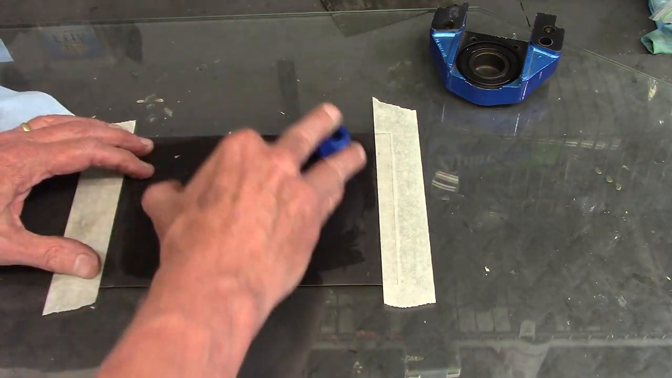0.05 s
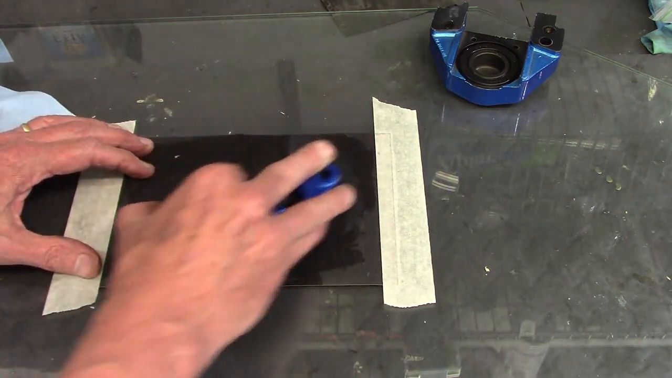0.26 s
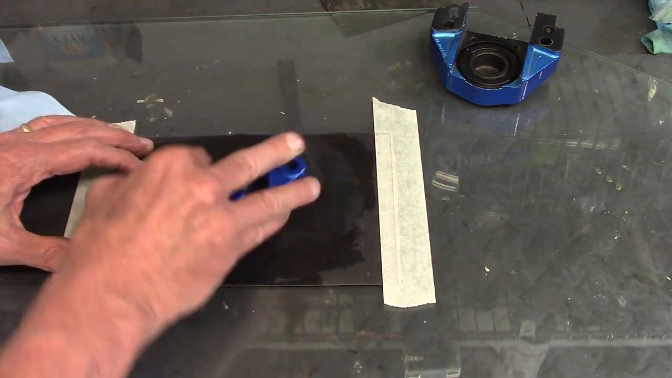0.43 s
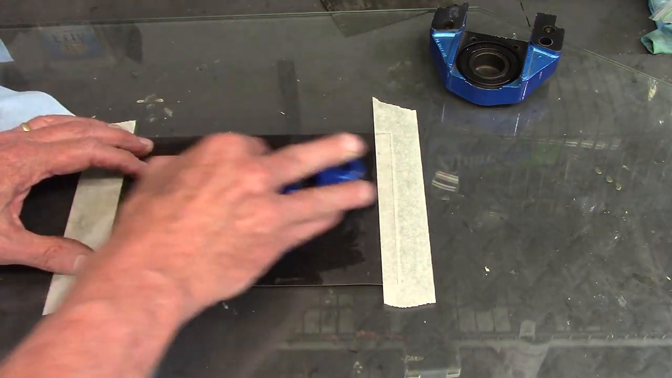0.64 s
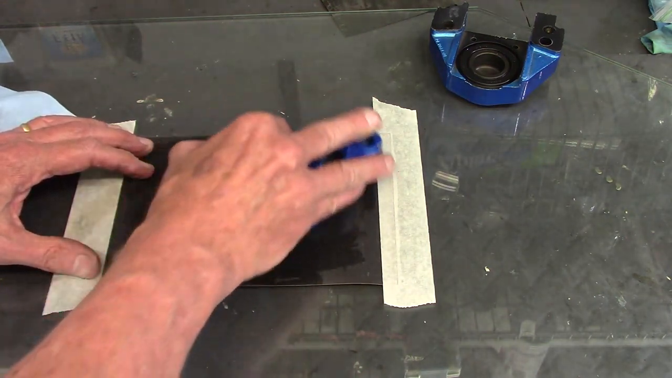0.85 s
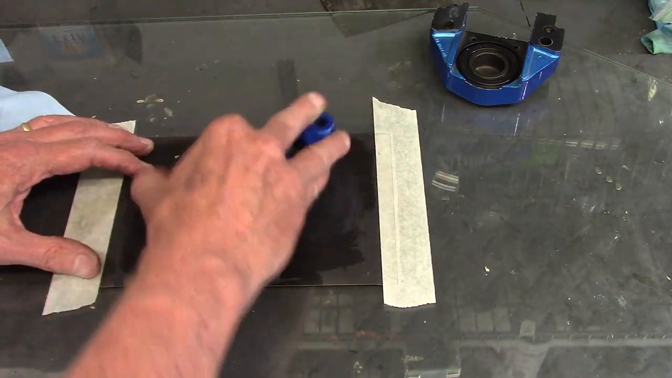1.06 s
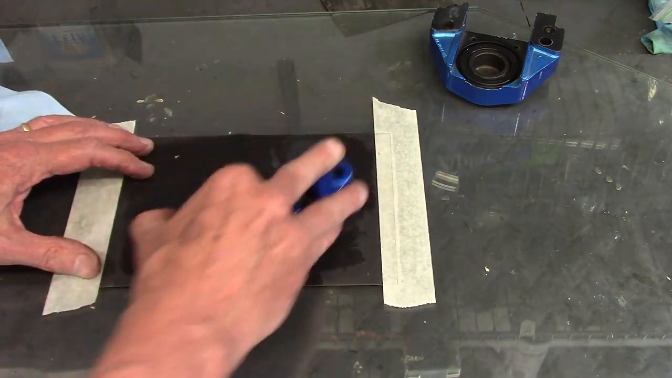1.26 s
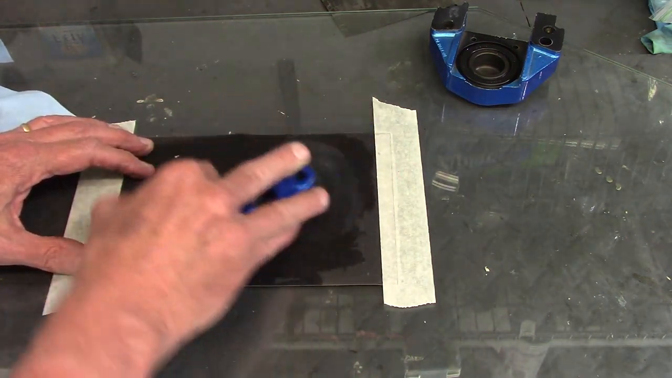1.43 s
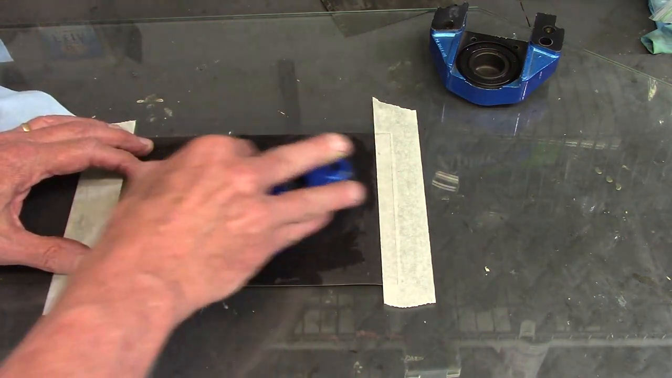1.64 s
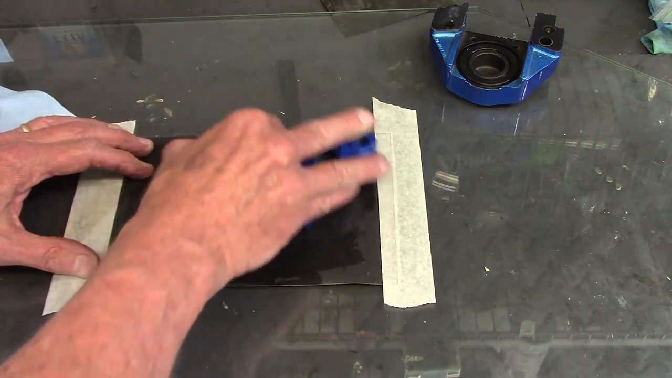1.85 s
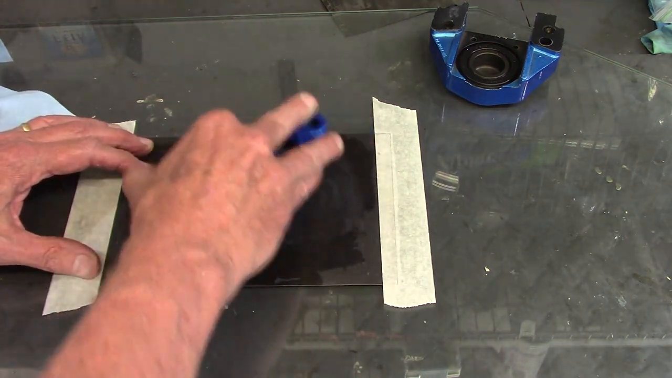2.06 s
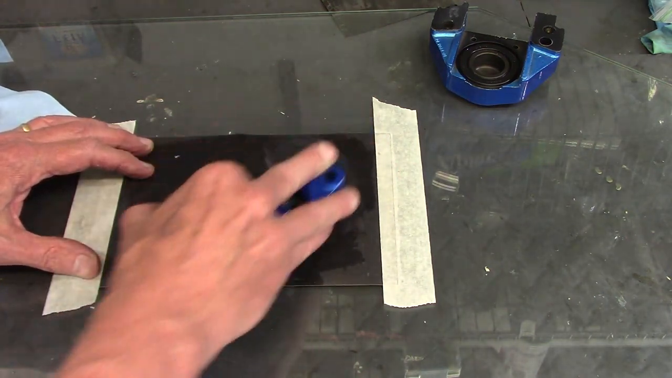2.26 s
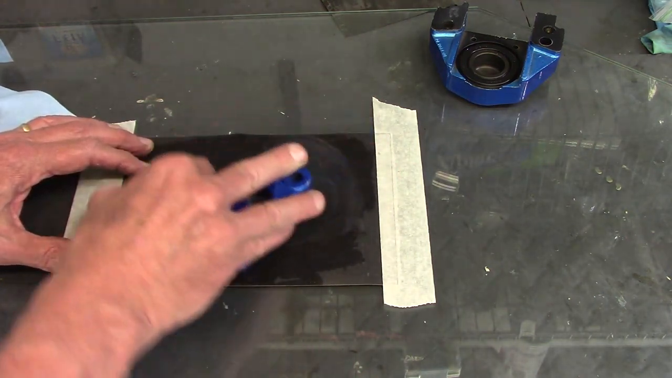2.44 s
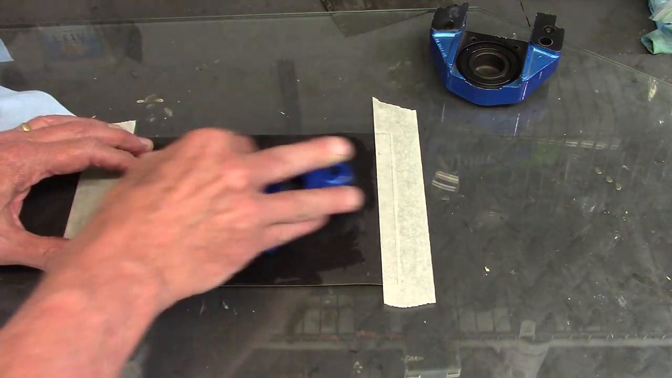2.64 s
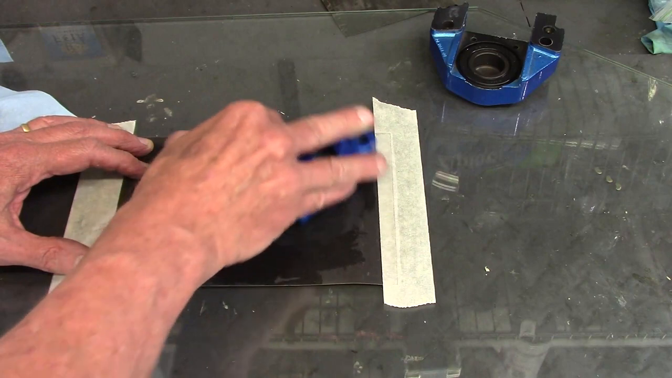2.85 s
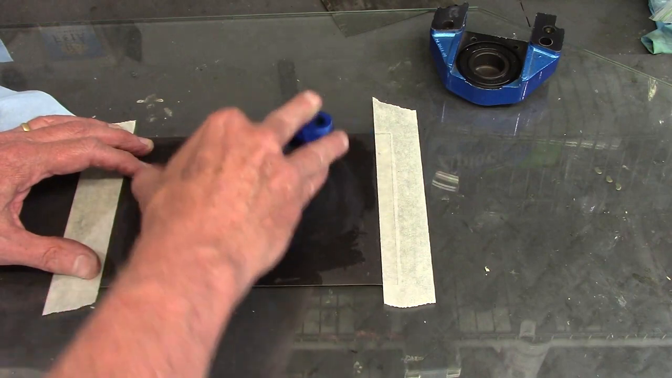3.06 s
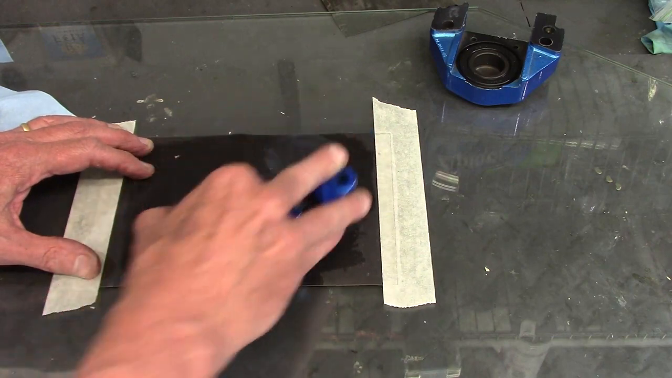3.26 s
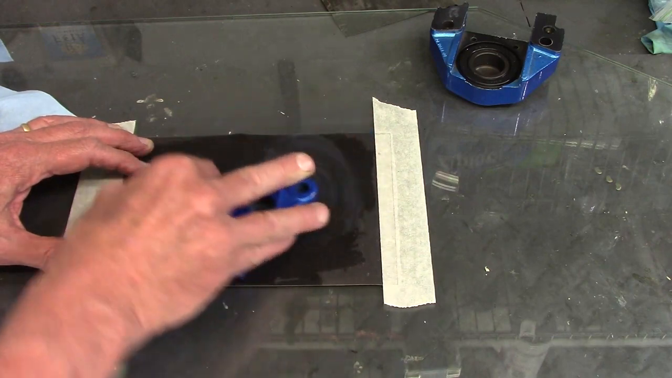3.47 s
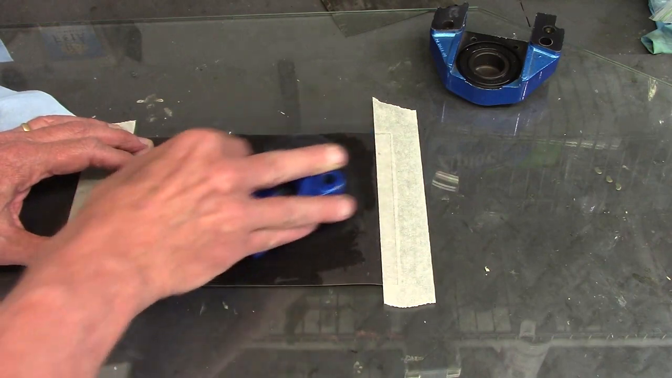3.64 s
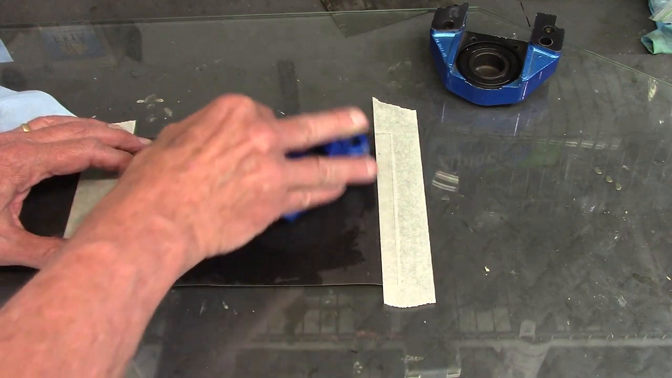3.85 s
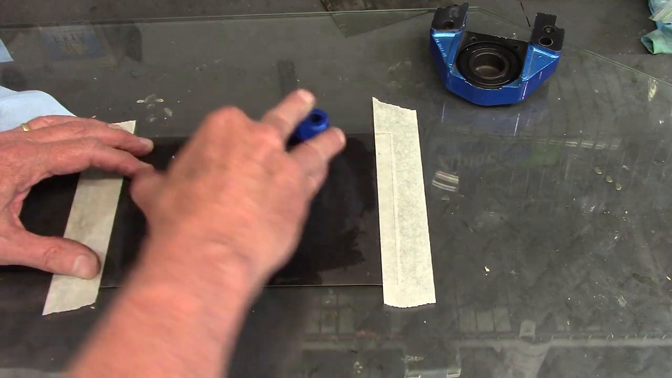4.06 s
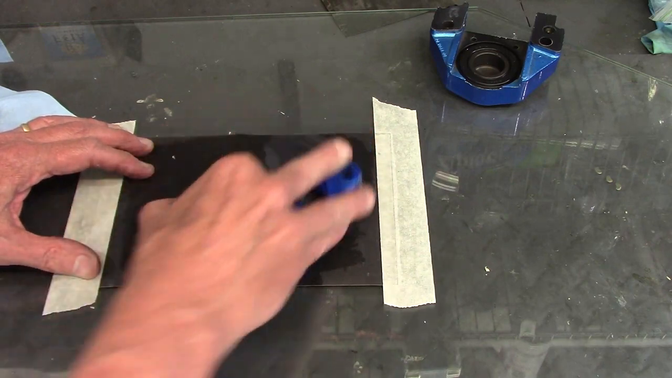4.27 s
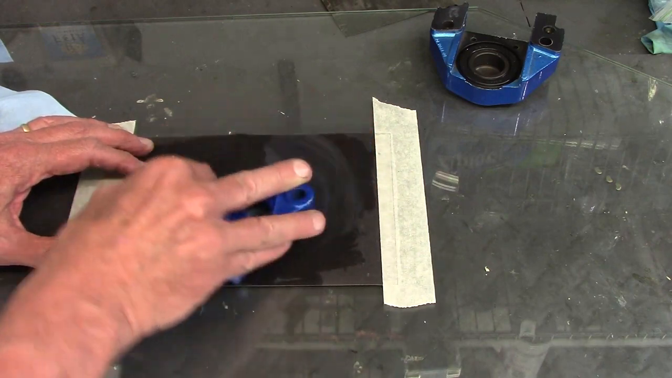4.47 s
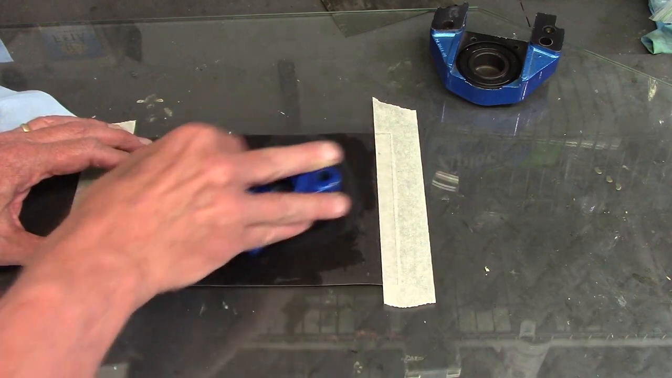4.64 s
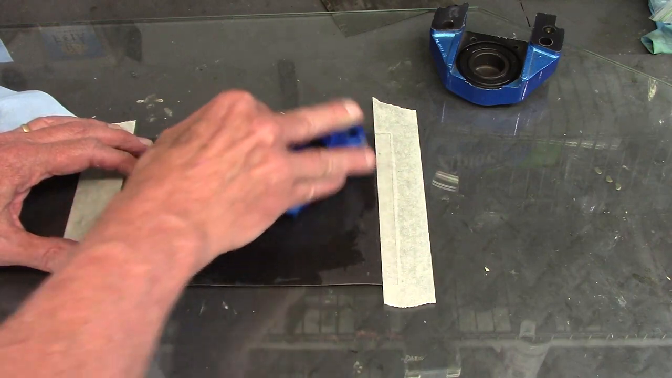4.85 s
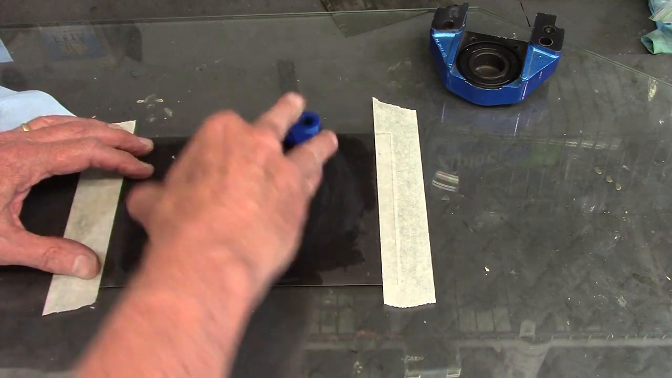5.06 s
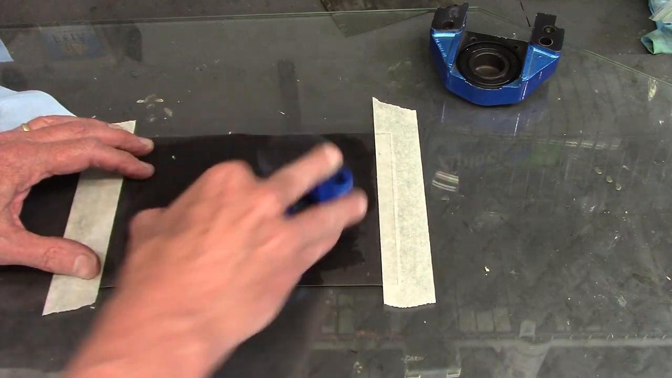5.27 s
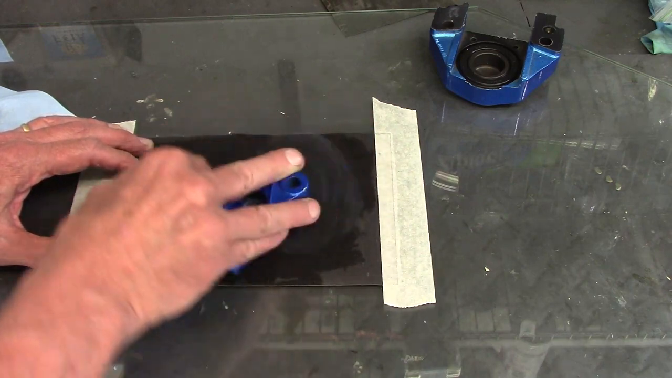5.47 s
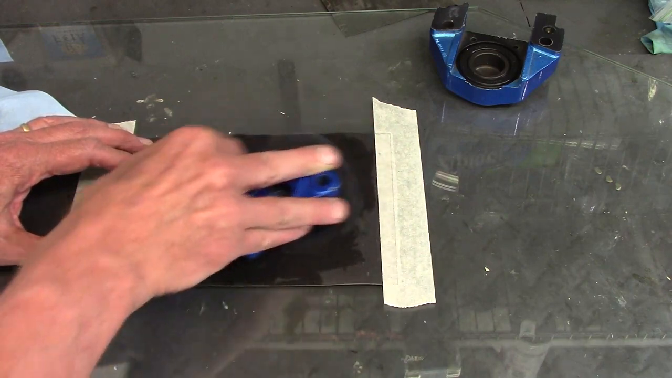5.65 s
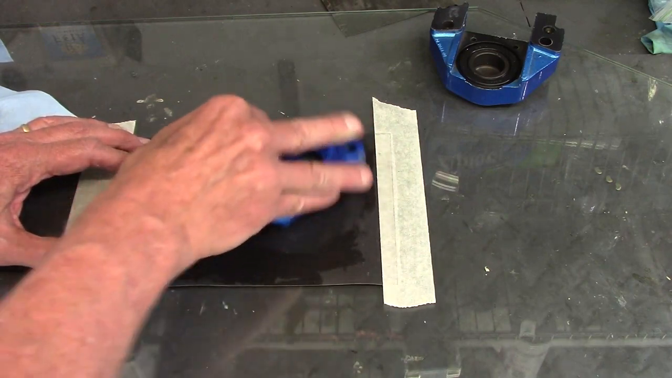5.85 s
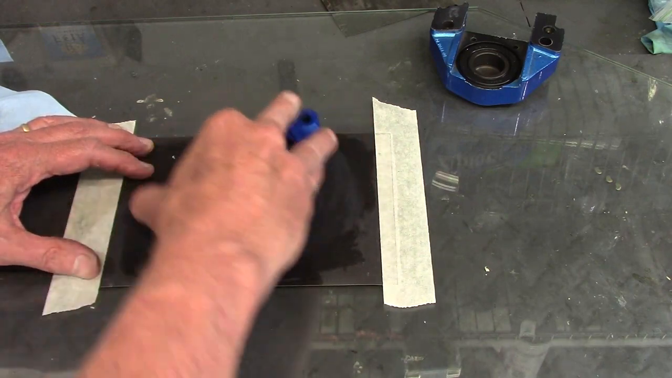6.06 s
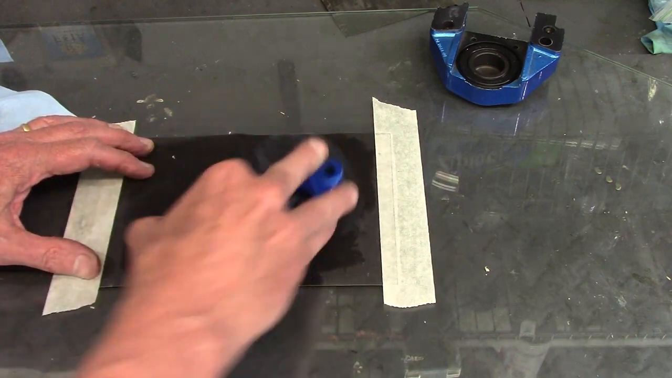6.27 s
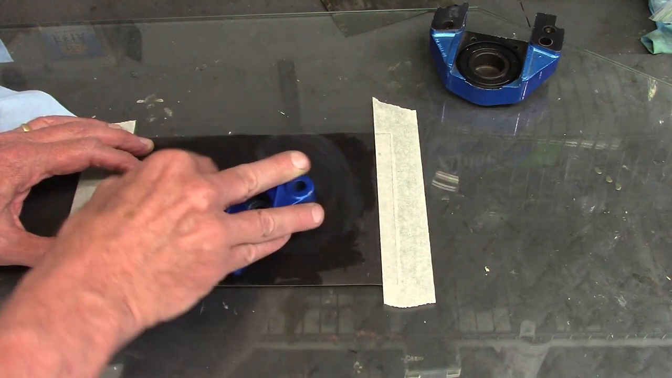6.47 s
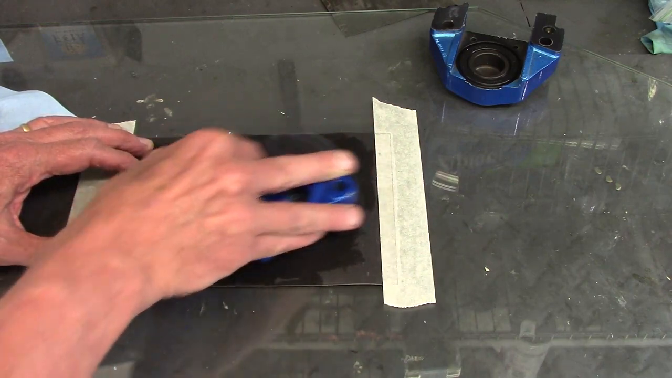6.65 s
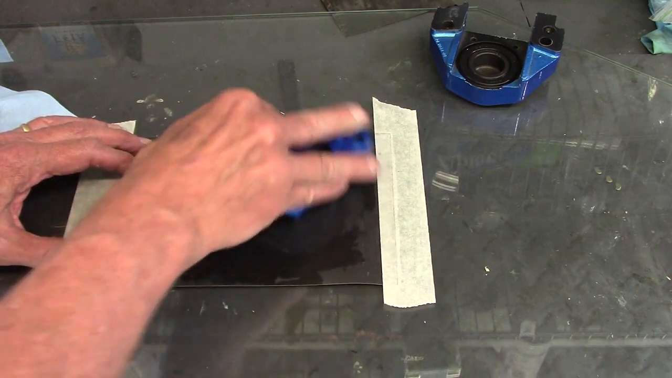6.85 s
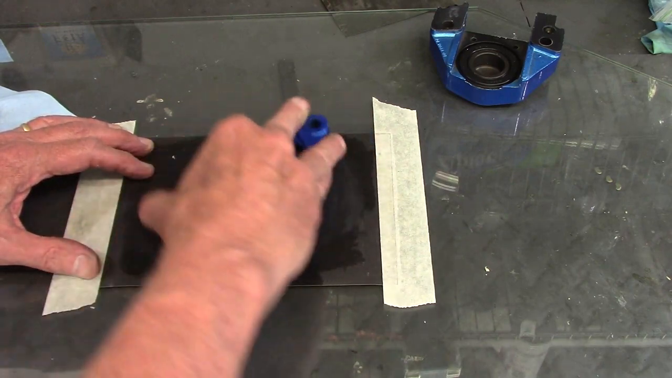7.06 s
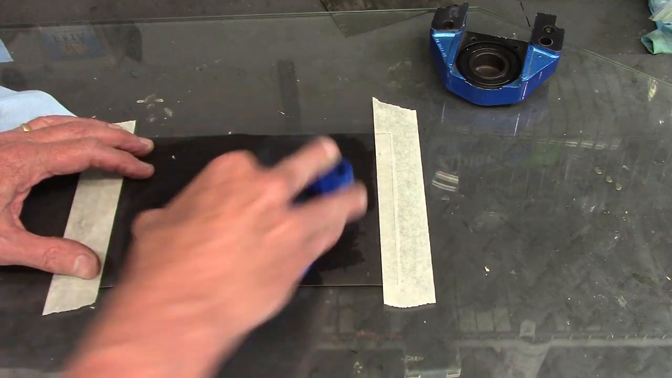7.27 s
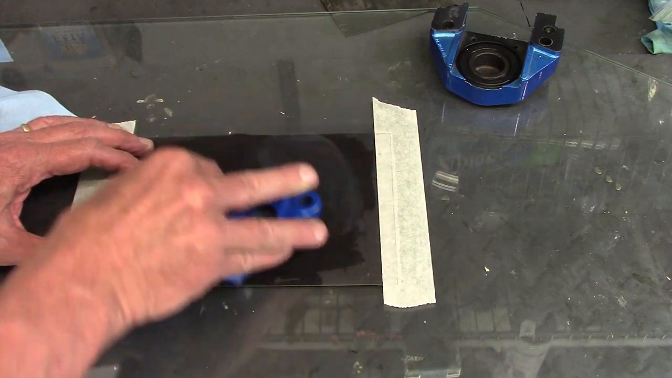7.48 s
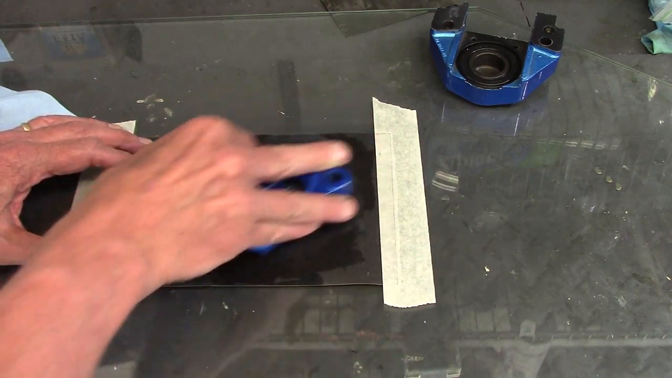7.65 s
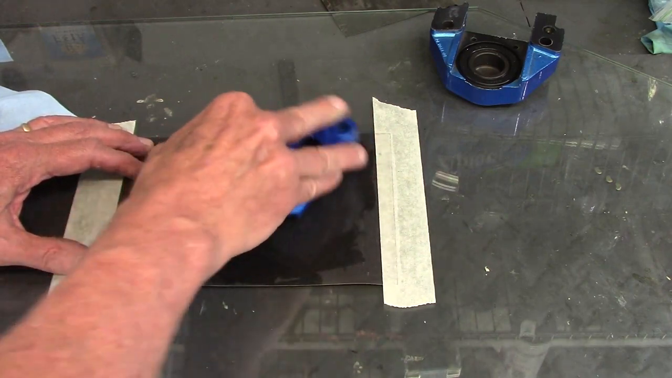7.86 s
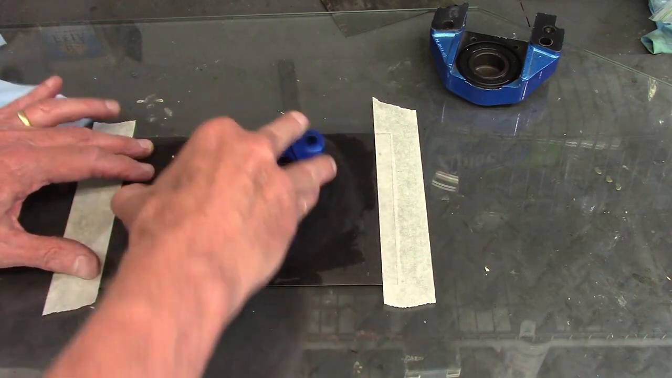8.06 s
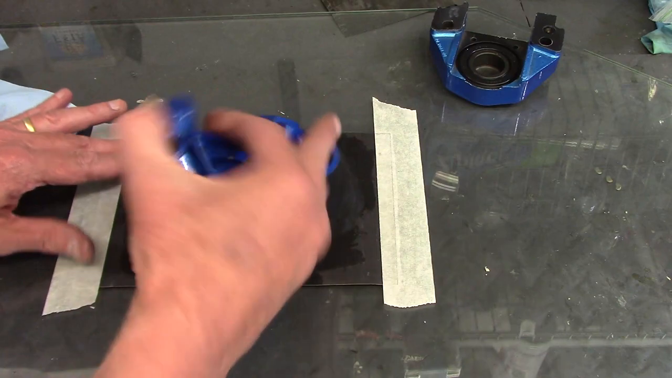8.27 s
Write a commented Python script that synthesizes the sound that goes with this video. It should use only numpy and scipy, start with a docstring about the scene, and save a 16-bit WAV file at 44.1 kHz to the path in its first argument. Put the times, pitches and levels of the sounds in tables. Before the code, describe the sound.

Steady wet sanding by hand fills nearly the whole stretch: coarse metallic scraping with a glassy middle and a papery hiss, pulsing gently with each lap and biting harder once a turn. Just after eight seconds a short scuff ends it suddenly and a minute drop ticks off. Low motor hum, rumble and faint bench thuds remain in the workshop. The sound is close, identical on both sides, with little room.

```python
"""Close by, a hand circles a metal part over wet sandpaper taped to a glass plate, about one lap a second.
Dense grit clicks ring glass, part and paper; which modes sing changes as the part goes round.
Near 8 s the hand eases, scuffs and tips the part up; an edge trails off the paper and a drop snaps off it.
All along, a motor hums over the low rumble of a workshop and the bench trembles, with three heavier thuds.
One close microphone feeds both channels."""
import sys
import numpy as np
from scipy import signal
from scipy.fft import rfft, irfft, next_fast_len
from scipy.io import wavfile

SR = 44100
rng = np.random.default_rng(int(sys.argv[2]) if len(sys.argv) > 2 else 0)


def store_wav(level_fs):
    """Save 16-bit WAV to argv[1]."""
    pcm = np.round(np.clip(np.atleast_2d(level_fs), -1, 1) * 32767)
    wavfile.write(sys.argv[1], SR, pcm.T.astype(np.int16))


def elevation(decibels):
    """Turn decibel levels (scalar or array-like) into linear amplitude ratios."""
    levels = np.asarray(decibels, float)
    return 10 ** (levels / 20)


N = 366471
LAP_S = 1.003  # the hand's path repeats
OFF_AT_S = 8.2  # the part is clear of the paper
TOP_HZ = 15730  # nothing is heard above this

# The modes of the five bodies under the hand: the glass plate's low modes and its ring,
# the metal part's low and high modes, and the wet paper.
# Each row: pitch in Hz, half width in Hz, level in dB beside the body's other modes,
# swing with the place on the plate in dB, phase of that swing in laps.
GLASS_LOW_MODES = [(500, 64, -2.6, 1.1, 0.51), (580, 73, -3.1, 1.0, 0.51), (630, 54, -1.3, 0.7, 0.49),
                   (780, 65, -3.9, 2.5, 0.85), (920, 170, -1.8, 1.1, 0.88), (1120, 124, 0.0, 1.3, 0.32),
                   (1280, 75, -3.4, 1.3, 0.27)]
GLASS_RING_MODES = [(1550, 163, -5.5, 1.4, 0.03), (1670, 93, -2.9, 0.8, 0.9), (1900, 123, 0.0, 1.2, 0.47),
                    (2030, 89, -6.9, 1.8, 0.35)]
PART_LOW_MODES = [(2200, 71, -4.2, 1.0, 0.91), (2460, 165, -0.3, 1.4, 0.56), (2760, 340, -4.2, 0.9, 0.78),
                  (3060, 102, -2.5, 1.6, 0.27), (3320, 99, -4.4, 1.7, 0.62), (3490, 276, -2.3, 0.5, 0.26),
                  (3760, 194, 0.0, 0.7, 0.27)]
PART_HIGH_MODES = [(4120, 110, -3.5, 0.6, 0.34), (4270, 178, -4.2, 0.2, 0.26), (4560, 221, 0.0, 0.6, 0.13),
                   (4840, 170, -3.4, 0.3, 0.58), (5160, 250, -6.8, 1.8, 0.72)]
PAPER_MODES = [(5920, 644, -0.5, 0.8, 0.15), (6090, 109, -1.1, 2.0, 0.08), (6510, 270, 0.0, 1.6, 0.62),
               (6970, 124, -1.4, 1.3, 0.36), (7440, 797, -1.2, 0.5, 0.46), (8040, 263, -6.7, 0.9, 0.93),
               (8860, 503, -2.7, 1.1, 0.73), (9510, 363, -5.9, 1.7, 0.81), (10480, 1165, -5.5, 0.4, 0.98),
               (13440, 5397, -8.6, 0.5, 0.15)]


def sanding():
    """Dense grit clicks of uneven size ring the modes of glass, part and paper,
    each from its own stretch of grit, while the part touches."""
    grains_per_s, size_db = 34000, 1.42
    judder_db, judder_hz, release_s = 0.5, 38, 0.039
    t = np.arange(N) / SR
    size = elevation(size_db * np.minimum(rng.exponential(1, N), 5))
    struck = rng.random(N) < grains_per_s / SR
    clicks = evened(size * rng.standard_normal(N) * struck)
    grit = rfft(clicks, next_fast_len(N))
    bodies = GLASS_LOW_MODES, GLASS_RING_MODES, PART_LOW_MODES, PART_HIGH_MODES, PAPER_MODES
    ringing = sum(body(modes, level_db, grit) for modes, level_db in zip(bodies, levels(t)))
    contact = np.clip((OFF_AT_S - t) / release_s, 0, 1)
    return contact * elevation(judder_db * wander(judder_hz)) * ringing


# The band the water film brightens. In order: centre in Hz, half width in Hz.
SLURRY_BAND = (9700, 1500)
# The modes a bite favours. In order: centre in Hz, half width in Hz, share of the bite's dB.
BITE_BAND = (3500, 450, 0.9)


def body(modes, level_db, grit):
    """Grit rings each mode; its share swings as the part travels and wanders over worn and fresh paper."""
    patchy_db, patch_hz = 2.0, 4.2
    brighten, bright_hz = 0.45, 6000  # share of the speed's dB gained per octave above this pitch
    size = next_fast_len(N)
    hz = np.fft.rfftfreq(size, 1 / SR)
    t = np.arange(0, N + 512, 256) / SR  # a gain every 256 samples
    smooth = signal.butter(2, patch_hz * 512 / SR, output="sos")
    patches = evened(signal.sosfiltfilt(smooth, rng.standard_normal((len(modes), len(t)))), axis=1)
    bite_db, speed_db, slurry_db = bites(t), speed(t), stroke(t)[1]
    slurry_hz, slurry_width = SLURRY_BAND
    bite_hz, bite_width, bite_share = BITE_BAND
    gains, shapes = [], []
    for (f, width, db, swing_db, phase), patch in zip(modes, patches):
        wet_db = np.exp(-((f - slurry_hz) / slurry_width) ** 2) * slurry_db
        edge_db = bite_share * np.exp(-((f - bite_hz) / bite_width) ** 2) * bite_db
        bright_db = brighten * max(np.log2(f / bright_hz), 0) * speed_db
        place_db = swing_db * np.cos(2 * np.pi * (t / LAP_S - phase)) + patchy_db * patch
        gains.append(elevation(db + place_db + wet_db + edge_db + bright_db))
        shapes.append((hz < TOP_HZ) / (1 + ((hz - f) / width) ** 2))
    # dividing by the total leaves the body's overall level to level_db
    total = np.sqrt(sum(g ** 2 * np.mean(shape ** 2) for g, shape in zip(gains, shapes)))
    out = 0
    for g, shape, start in zip(gains, shapes, rng.integers(0, size, len(modes))):
        # each mode is struck by other grains: its own stretch of the grit
        ring = np.roll(irfft(grit * shape, size), start)[:N]
        out = out + np.interp(np.arange(N) / SR, t, g / total) * ring
    return elevation(level_db) * out


# How each body answers the hand: low glass, glass ring, low part, high part, paper.
# Each row: base level in dB, then the shares taken of the dB of speed, bites, muffling and pressure.
RESPONSE = [(-28, -0.34, -0.12, 0.2, 0.99), (-26, 0.16, 0.03, 0.99, 1.2), (-28.4, 0.41, 0.99, 0.43, 0.96),
            (-29, 0.57, 1.22, 0.35, 0.53), (-27, 0.99, -0.17, -0.41, -0.04)]
# Lifting off, for the same bodies.
# Each row: easing before it in dB, last scuff in dB, change as the part tips up in dB.
LIFTING_OFF = [(-5, 1.5, -9), (-3, -1.5, -16), (-0.5, 11, -8), (-0.5, 11, -13), (0.8, -2.5, -16)]
# Once a lap, at the far end of the path, the muffling of the glass ring, shared out by RESPONSE.
# Each row: time in seconds, depth in dB.
FAR_ENDS = [(1.03, 3), (2.06, 3), (3.01, 1.5), (3.99, 4.5), (4.94, 2.5), (5.99, 4.2), (6.97, 5.5),
            (7.92, 2.9)]


def levels(t):
    """The level in dB of each body, from speed, bites, place, pressure and lifting off."""
    far_end_s = 0.135
    tip_at_s, tip_s = 8.032, 0.026
    trail_db_per_s = -160  # one edge trails over the paper until it is clear
    uneven_db, uneven_hz = 0.73, 9  # each body's level wanders
    muffling = -bumps(FAR_ENDS, far_end_s, t)
    hand = [np.ones(N), speed(t), bites(t), muffling, stroke(t)[0]]
    easing = ramp(7.96, 0.03, t)
    scuff = bumps([(8.014, 1)], 0.017, t)
    lift = [easing, scuff, ramp(tip_at_s, tip_s, t)]
    trail_db = trail_db_per_s * np.maximum(t - tip_at_s - tip_s, 0)
    wandering_db = uneven_db * np.array([wander(uneven_hz) for _ in RESPONSE])
    return np.dot(RESPONSE, hand) + np.dot(LIFTING_OFF, lift) + trail_db + wandering_db


# Sweeps of the hand, each starting at a turn, mostly slower there than midway.
# Each row: time of the turn in seconds, speed in the turn in dB, speed midway in dB.
SWEEPS = [(-0.0, 1, -1.3), (0.18, -3, -0.3), (0.47, -3.3, 2.5), (0.72, -4, -0.5), (1.01, -1.2, 2),
          (1.23, -1.1, 1), (1.52, -1.7, 3), (1.74, -1.5, 1.5), (2.0, -2, 2.7), (2.23, -0.1, 0.8),
          (2.51, -2.5, 3.1), (2.74, -1.5, -0.2), (3.01, -0.3, 2.0), (3.26, -0.3, 0.5), (3.5, -2.2, 2.0),
          (3.76, -1.5, 1.3), (3.96, -1.3, 1.5), (4.23, -1.3, 2.0), (4.45, -1.5, 2.5), (4.78, -0.5, 2.5),
          (4.94, -1.5, 2.5), (5.26, -2, 2.3), (5.48, -3, 2), (5.78, -2.3, 3), (5.96, -2.4, 3),
          (6.23, -1.4, 2.3), (6.48, -4.3, 3), (6.67, 1.3, 2.5), (6.93, 0.2, -0.2), (7.16, -2.5, 1.8),
          (7.38, -0.2, -0.5), (7.52, -1, 2), (7.73, -1.5, 0.5), (7.91, -1.5, -1)]


def speed(t):
    """The hand's speed in dB, swinging smoothly from turn to midway and on to the next turn."""
    midway_at = 0.51  # share of a sweep
    s, turn_db, midway_db = np.transpose(SWEEPS)
    midways = s + midway_at * np.diff(s, append=OFF_AT_S)
    knots = np.ravel([s, midways], "F")  # turn, midway, turn, midway ..
    count = np.arange(len(knots))
    place = np.interp(t, knots, count)
    eased = np.floor(place) + 0.5 - 0.5 * np.cos(np.pi * (place % 1))
    return np.interp(eased, count, np.ravel([turn_db, midway_db], "F"))


# An edge of the part bites into the grit. Each row: time in seconds, strength in dB.
BITES = [(0.03, 0.3), (1.07, 2.2), (2.08, 3), (3.06, 3), (3.33, 1.2), (4.06, 2.5), (4.29, 0.7), (5.06, 3),
         (5.34, 3), (6.06, 3.5), (6.27, 0.4), (7.07, 4), (7.4, 3.0), (7.93, 3.5)]


def bites(t):
    """The strength in dB of the edge digging in, one bell per bite."""
    return bumps(BITES, 0.11, t)


# The stroke of the hand.
# Each row: time in seconds, pressure of the hand in dB, lift of the slurry band in dB.
STROKE = [(0.0, 2, -6), (0.61, 0, -3), (1.22, 0.7, -3), (1.84, 0.1, -0.7), (2.45, 0.5, -4),
          (3.06, -0.0, 0.1), (3.67, -0.3, 0), (4.29, -0.35, 3.5), (4.9, -0.0, -1), (5.51, -0.3, -5.5),
          (6.12, 0.1, 3.5), (6.74, -0.3, 1.5), (7.35, -0.5, 2), (7.96, -1.3, -3)]


def stroke(t):
    """The hand's pressure and the wet film's brightness in dB, gliding from row to row."""
    s, pressure_db, slurry_db = np.transpose(STROKE)
    return np.interp(t, s, pressure_db), np.interp(t, s, slurry_db)


# A drop snapping off the lifted part. Each row: start in seconds, peak level in dB.
DRIPS = [(8.1648, -40)]
# The tone of the drop. Each row: frequency in Hz, relative density in dB per Hz.
DRIP_SPECTRUM = [(1180, -40), (2000, -10), (3660, -7), (9120, -7), (9940, -2), (15700, -12)]


def drips():
    """Each drop is a short wet crackle: coloured noise under a bell."""
    length_s = 0.0049
    t = np.arange(N) / SR
    shape = sum(elevation(db) * np.exp(-((t - s - length_s) / length_s) ** 2) for s, db in DRIPS)
    return shape * evened(coloured(rng.standard_normal(N), lambda hz: elevation(read(DRIP_SPECTRUM, hz))))


# The die-away around the close microphone. Each row: frequency in Hz, time to fall 60 dB in seconds.
ROOM_T60 = [(500, 0.78), (2000, 0.18), (5000, 0.083), (12000, 0.066)]


def room(x):
    """A noise tail whose bands die at their own speeds."""
    hz, t, z = signal.stft(rng.standard_normal(SR // 2), SR, nperseg=256)
    decay = elevation(-60 * t / read(ROOM_T60, hz)[:, None])
    tail = signal.istft(z * decay, SR, nperseg=256)[1]
    return signal.fftconvolve(x, tail / np.linalg.norm(tail))[:N]


def workshop():
    """The background: rumble, motor hum and the low movement of the bench."""
    return rumble() + motor_hum() + bench()


# The rumble of the workshop. Each row: frequency in Hz, relative density in dB.
RUMBLE_SPECTRUM = [(30, -33), (45, 0.5), (70, -9), (88, -8.5), (108, -13), (130, -10), (160, -18),
                   (215, -21.5), (240, -19.5), (280, -24.5), (350, -14.5), (420, -18), (600, -15),
                   (750, -26.5), (1500, -32), (15700, -49)]


def rumble():
    """Steady noise shaped to the workshop's low spectrum."""
    noise = coloured(rng.standard_normal(N), lambda hz: elevation(read(RUMBLE_SPECTRUM, hz)))
    return elevation(-39.5) * evened(noise)


def motor_hum():
    """A low sine whose pitch and level waver."""
    mean_hz, mean_db = 29.3, -37.5
    turns = np.cumsum(mean_hz * (1 + 0.012 * wander(1.2))) / SR
    return np.sqrt(2) * elevation(mean_db + 1.5 * wander(3.5)) * np.sin(2 * np.pi * turns)


# Heavier thuds of the bench. Each row: time in seconds, level in dB added at the peak.
THUDS = [(0.58, -38), (3.49, -39), (7.22, -28)]


def bench():
    """Noise around 24 Hz: a steady tremble of the bench, swelling in each thud."""
    tremble_db, thud_s = -43.5, 0.12
    t = np.arange(N) / SR
    shaking = evened(coloured(rng.standard_normal(N), lambda hz: np.exp(-((hz - 24) / 14) ** 2)))
    swells = bumps([(s, elevation(db)) for s, db in THUDS], thud_s, t)
    return (elevation(tremble_db) + swells) * shaking


def evened(x, axis=None):
    """Scales to rms 1."""
    return x / np.sqrt(np.mean(abs(x) ** 2, axis=axis, keepdims=True) + 1e-20)


def read(points, hz):
    """Reads a spectrum on a log-frequency axis."""
    f, value = np.transpose(points)
    return np.interp(np.log(hz + 1), np.log(f + 1), value)


def coloured(x, gain):
    """Multiplies the spectrum of x by gain(Hz)."""
    size = next_fast_len(len(x))
    return irfft(rfft(x, size) * gain(np.fft.rfftfreq(size, 1 / SR)), size)[:len(x)]


def wander(top_hz):
    """Slow chance up to about top_hz, rms 1."""
    return evened(coloured(rng.standard_normal(N), lambda hz: 1 / (1 + (hz / top_hz) ** 4)))


def bumps(events, width_s, t):
    """A bell of each event's height around its time."""
    return sum(height * np.exp(-((t - s) / width_s) ** 2) for s, height in events)


def ramp(start_s, length_s, t):
    """Rises from 0 to 1."""
    return np.clip((t - start_s) / length_s, 0, 1)


def scene():
    """The near work, its faint room tail and the workshop, the same on both channels."""
    near = sanding() + drips()
    room_db = -22
    return np.tile(near + elevation(room_db) * room(near) + workshop(), (2, 1))


def roll_off(x):
    """The treble ends steeply here."""
    return signal.sosfilt(signal.butter(12, 16990, fs=SR, output="sos"), x)


def record(dry):
    """Cuts everything above the top of the band and returns the finished mix."""
    limited = np.array([coloured(channel, lambda hz: hz < TOP_HZ) for channel in dry])
    return roll_off(limited)


dry = scene()
out = record(dry)
store_wav(out)
```